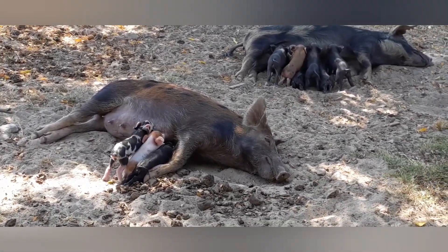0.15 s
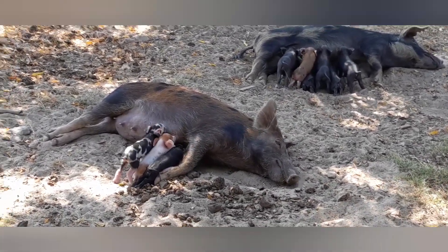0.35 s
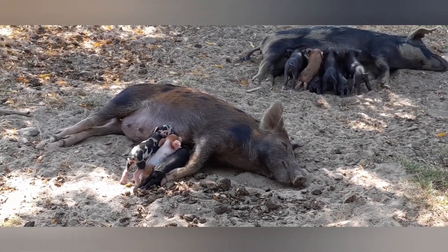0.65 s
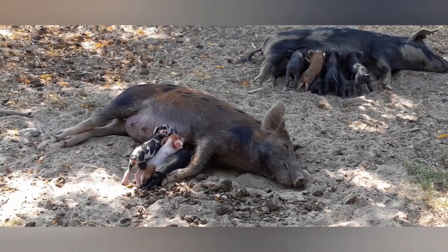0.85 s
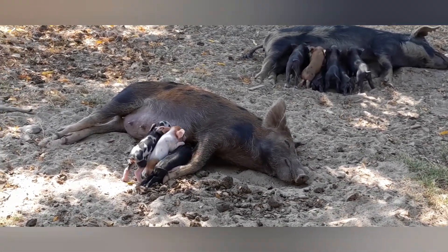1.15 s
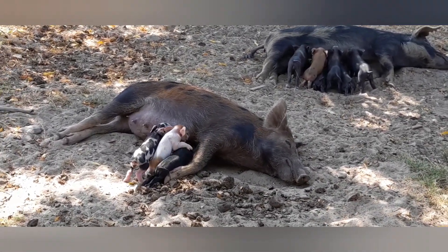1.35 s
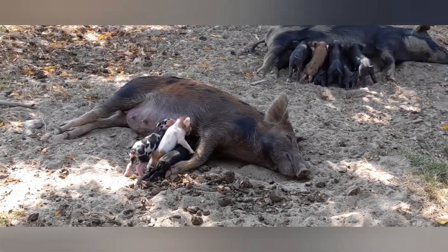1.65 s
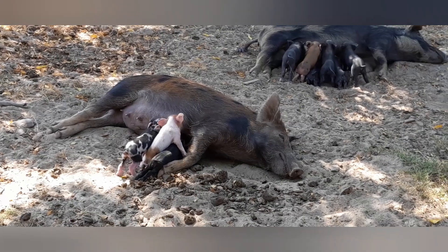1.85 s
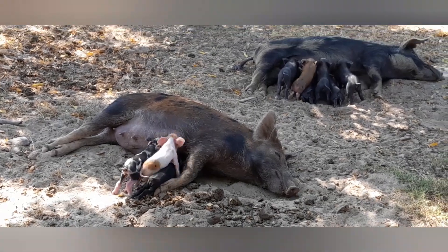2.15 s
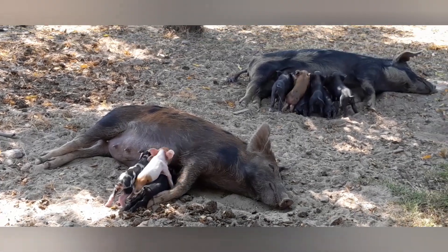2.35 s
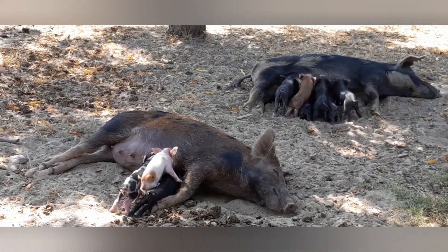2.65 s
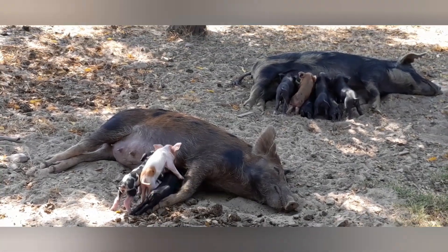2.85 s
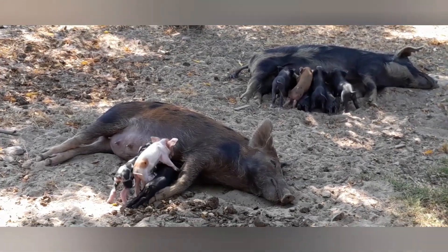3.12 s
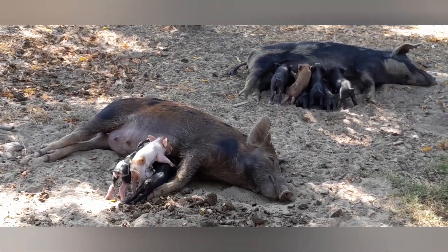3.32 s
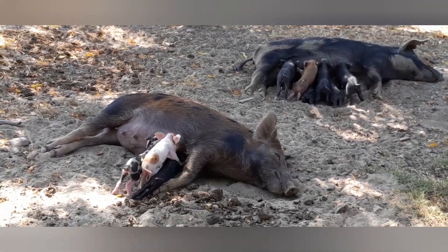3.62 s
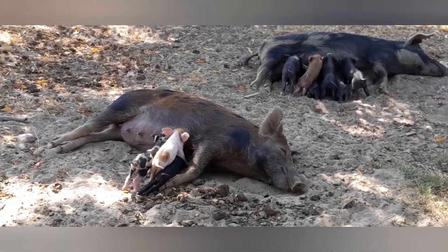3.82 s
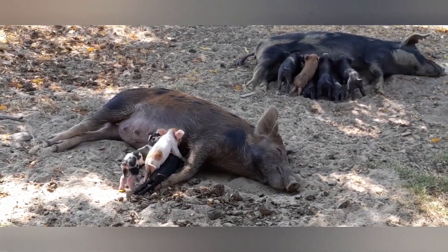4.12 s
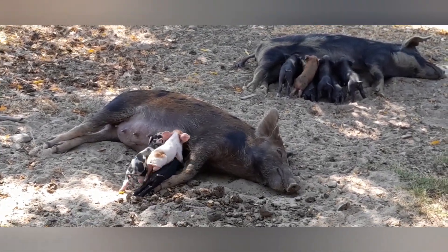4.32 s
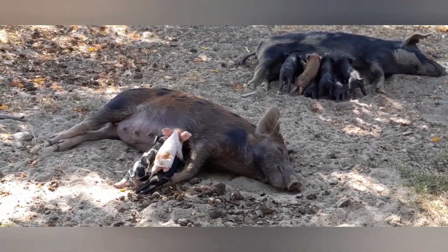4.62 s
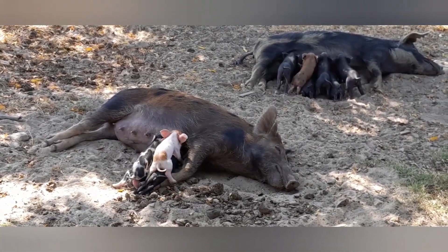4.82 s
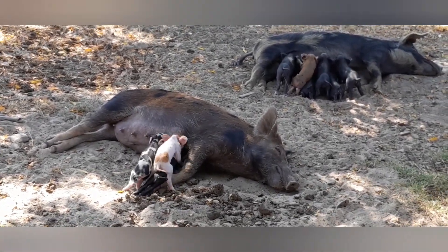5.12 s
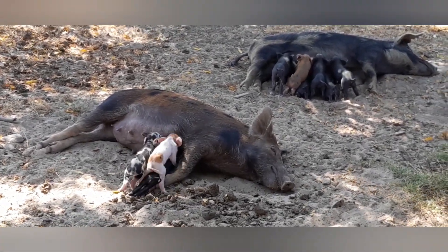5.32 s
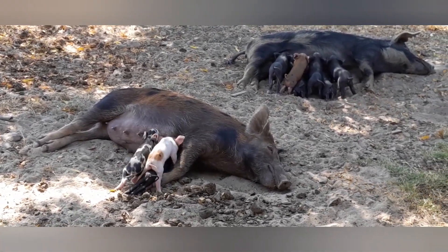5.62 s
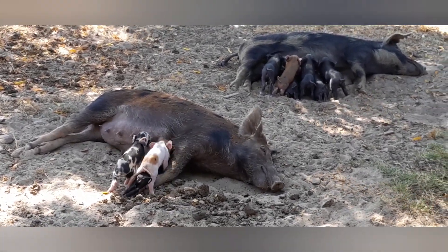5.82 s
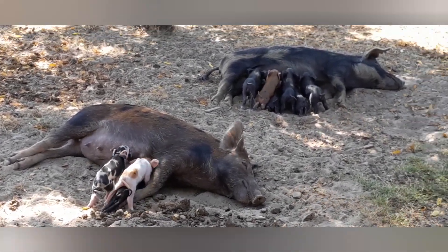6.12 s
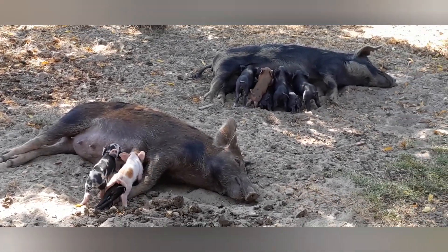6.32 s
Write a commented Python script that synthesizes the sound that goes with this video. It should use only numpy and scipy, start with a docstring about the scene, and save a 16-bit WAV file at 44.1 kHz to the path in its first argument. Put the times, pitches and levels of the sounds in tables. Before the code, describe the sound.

In an open, shaded yard, low wind rumble buffets the microphone from the start, heaviest to the left, fading by about 1.8 seconds. A steady soft hiss and high, pulsing insect buzz and lisping chirps, around two swells a second, continue throughout. A sow close by grunts quietly at 0.2 seconds, then more fully near 0.7, 1.25, 1.8, 2.4, 2.9, 3.5 and 4.1, weakly at 4.9, then at 5.3 and 5.8. Each is a deep, rattling throat pulse train, mostly a tenth of a second, with longer ones at 1.8, 2.9, 4.1 and 5.8. Soft fluttering snorts come around 0.6, 1.1, 1.7, 2.4, 5.0, 5.5 and, strongest, 6.1. Tiny muffled piglet grunts appear near 0.4, 2.9, 3.9 and 5.25. Very faint far whistles rise near 0.3, 2.0, 3.9 and 5.6. Faint gusts return around 4.5 and 5.0, with a stronger rumble at 6.1.

```python
"""Wind rumbles and insects buzz, then a sow starts to grunt in a steady rhythm while her piglets suckle.
Each grunt is a short train of slow throat pulses ringing in chest, nose, throat and snout.
Softer snorts flap in between, and the piglets add brief breathy grunts made of ringing noise.
The insects are swelling coloured noise, the thin far whistles are wavering tones,
and the gusts are low noise that swells and fades. A steady hiss fills the grove."""
import sys
import numpy as np
from scipy import signal
from scipy.fft import rfft, irfft, next_fast_len
from scipy.io import wavfile
from scipy.ndimage import uniform_filter1d

SR = 44100
rng = np.random.default_rng(int(sys.argv[2]) if len(sys.argv) > 2 else 0)


def master(y):
    """Save y as 16-bit WAV."""
    cut = np.clip(np.atleast_2d(y).T, -1, 1)
    pcm = np.round(cut * 32767)  # scale
    wavfile.write(sys.argv[1], SR, pcm.astype(np.int16))


N = 284886
TIME = np.arange(N) / SR

# The sow's grunts. Each row: start in seconds, length in seconds, opening pulse rate in Hz,
# settled pulse rate in Hz, age at the hardest push in seconds,
# then the relative strengths of chest, throat and rasp in dB.
GRUNT_ROWS = [(0.177, 0.096, 84.04, 53.2, 0.057, -41.5, -50.5, -59.5),
              (0.732, 0.108, 80.94, 47.44, 0.053, -37, -42.5, -40.5),
              (1.25, 0.12, 66.73, 60.8, .06, -37, -45, -45.5),
              (1.781, 0.25, 80.12, 52.17, 0.11, -36, -42.5, -45),
              (2.397, 0.11, 74.4, 45.97, 0.037, -36.5, -43, -45),
              (2.924, 0.2, 69.8, 53.39, 0.06, -35, -42, -42),
              (3.531, 0.12, 68.5, 53.73, 0.044, -34.5, -43, -43.5),
              (4.095, 0.295, 66.02, 51.63, 0.029, -37.5, -42.5, -45),
              (4.856, 0.074, 88, 46.21, 0.021, -47, -49.5, -63.5),
              (5.293, 0.115, 97.86, 54.44, 0.014, -40.5, -44.5, -49),
              (5.82, 0.32, 80.44, 50.28, 0.14, -38, -43, -45)]
SLOWING_S = 0.035  # the pulses slow from the opening rate to the settled one
FADE_S, FADE_SLOWING = 0.015, 0.15  # the last pulses drag: over this time, by this share of the rate


def throat_pulses(jitter_s):
    """Times and periods of the throat pulses: quick as a grunt starts, then settling to a slow rattle."""
    times, periods = [], []
    for start, length, opening_hz, settled_hz, *_ in GRUNT_ROWS:
        age = np.arange(0, length, 1 / SR)
        rate = settled_hz + (opening_hz - settled_hz) * np.exp(-(age / SLOWING_S) ** 2)
        rate = rate * (1 - FADE_SLOWING * np.exp((age - length) / FADE_S))
        cycles = np.cumsum(rate) / SR
        # one pulse each time the count of cycles reaches a whole number
        closing = np.searchsorted(cycles, np.arange(cycles[-1]))
        times.extend(start + age[closing])
        periods.extend(1 / rate[closing])
    jitter = jitter_s * rng.standard_normal(len(times))
    return np.array(times) + jitter, np.array(periods)


PUSH_S = 0.011  # half length of the hardest push


def current_grunt():
    """At every moment: age of the grunt under way, its length, its push (0-1) and its three strengths."""
    rows = np.array(GRUNT_ROWS)
    # each row takes over 0.05 s before its grunt starts
    row_now = np.maximum(np.searchsorted(rows[:, 0] - 0.05, TIME) - 1, 0)
    start, length, _, _, push_s, *levels_db = rows[row_now].T
    age = TIME - start
    push = np.exp(-((age - push_s) / PUSH_S) ** 2)
    return age, length, push, levels_db


def settling(age, after_s, over_s):
    """0 in the harsh start of each grunt, rising to 1 as the folds find a steady swing."""
    return 0.5 + 0.5 * np.tanh((age - after_s) / over_s)


def effort(age, length, soft_db, attack_s, hold_s, sag_db_per_s, release_share, release_db):
    """Gain through a grunt: it starts soft, swells, sags as the push weakens, and dies over its last part."""
    attack = soft_db * np.exp(-np.maximum(age, 0) / attack_s)
    sag = sag_db_per_s * np.maximum(age - hold_s, 0)
    release = release_db * np.maximum(1 + (age / length - 1) / release_share, 0)
    return from_db(-attack - sag - release)


# Resonances of the sow's chest, nose and throat.
# Each row: frequency in Hz, width of one filter pass in Hz, relative level in dB.
CHEST_MODES = [(64, 23, 3.5), (97.3, 40, 3), (161.7, 73, 1.5)]
NOSE_MODES = [(240.4, 71, -0.5), (296, 74.7, 6), (392, 41, -11.5)]
THROAT_MODES = [(696.3, 153, 4.6), (806.2, 103.6, 6.95)]
# Resonances of the snout as a grunt bursts out, and once it has settled; same columns.
SNOUT_EARLY_MODES = [(1118, 184, -13), (1356, 138, -6), (1523, 120, 1.5), (1769, 144, -5.5),
                     (2153, 160, -3), (2630, 570, -20), (5060, 620, -18.5), (8850, 2400, -34)]
SNOUT_LATE_MODES = [(1030, 300, -14), (1450, 260, -6.5), (1624, 43, -1), (1730, 130, 1.5), (2187, 43, 0),
                    (2460, 950, -16)]
PUSH_RASP_DB, PUSH_THROAT_DB = 7, 2  # what the hardest push adds


def grunts():
    """The folds part with a small flick and shut with a snap; both ring in the airway, with a puff of air."""
    times, periods = throat_pulses(jitter_s=0.0004)
    age, length, push, (chest_db, throat_db, rasp_db) = current_grunt()
    settled = settling(age, after_s=0.097, over_s=0.0063)

    # the rasp rises fastest, the chest fills last
    chest = from_db(chest_db) * effort(
        age, length, soft_db=7.5, attack_s=0.049, hold_s=0.14,
        sag_db_per_s=47, release_share=0.21, release_db=5.5)
    throat = from_db(throat_db + PUSH_THROAT_DB * push) * effort(
        age, length, soft_db=8, attack_s=0.024, hold_s=0.096,
        sag_db_per_s=33.5, release_share=0.27, release_db=14)
    rasp = from_db(rasp_db + PUSH_RASP_DB * push) * effort(
        age, length, soft_db=3.5, attack_s=0.014, hold_s=0.05,
        sag_db_per_s=34.5, release_share=0.36, release_db=11)

    def drive(level, shimmer_db):
        """Pulses of slightly uneven size; slower pulses are larger, to keep the power."""
        uneven = from_db(shimmer_db * rng.standard_normal(len(times)))
        sizes = np.interp(times, TIME, level) * np.sqrt(periods * SR) * uneven
        return clicks(times, sizes)

    def snap(pulses, flick):
        """Each closing snap, a smaller flick 2.553 ms before it, and a puff of air."""
        air = (0.72 - 0.3 * settled) * puffs(pulses, decay_s=0.005)
        return pulses + flick * delay(pulses, -0.002553) + air

    chest_pulses = drive(chest * (1 - 0.22 * settled), shimmer_db=0.54)
    low = -from_db(-2.5) * resonate(snap(chest_pulses, flick=0.063), CHEST_MODES)

    # in a settled grunt the chest hums cleanly at twice the pulse rate
    cycles = np.interp(TIME, times, np.arange(len(times)))
    is_pulsing = np.gradient(cycles) * SR > 30
    swinging = uniform_filter1d(1.0 * is_pulsing, size=SR // 50)
    hum = from_db(-1.0) * chest * settled * swinging * np.cos(4 * np.pi * cycles)

    nose_pulses = drive(np.sqrt(chest * throat), shimmer_db=0.5)
    nasal = from_db(-2) * resonate(snap(nose_pulses, flick=0.046), NOSE_MODES)
    mouth_pulses = drive(throat, shimmer_db=1.8)
    mouth = from_db(1.0) * resonate(snap(mouth_pulses, flick=0.2), THROAT_MODES)

    crackle = delay(snap(drive(rasp, shimmer_db=1.5), flick=0.34), 0.001048)
    snout_early = from_db(-5.5) * resonate(crackle * (1 - settled), SNOUT_EARLY_MODES)
    snout_late = from_db(-4.0) * resonate(crackle * settled, SNOUT_LATE_MODES)
    return from_right(low + hum + nasal + mouth + snout_early + snout_late, lag_s=0.00013)


# The sow's snorts. Each row: time of the middle flap in seconds, relative level in dB,
# flaps per second, dB gained from flap to flap.
SNORT_ROWS = [(0.564, -36.5, 32.7, -3), (1.11, -30, 33.2, 0), (1.721, -33.5, 36.3, 4),
              (2.364, -33.5, 34.4, -2.5), (4.979, -34, 42, -2), (5.454, -28.5, 29.7, 4),
              (6.089, -26, 32, -1)]
# Resonances of the airway in a snort. Each row: frequency in Hz, width of one filter pass in Hz,
# relative level in dB.
SNORT_MODES = [(94, 109, 2.5), (311.5, 100, 9.5), (661.6, 113, 7), (1004, 110, -14.5), (1338, 165, -4),
               (1580, 270, -11), (2380, 2200, -23)]


def snorts():
    """Air streams through the snout while soft tissue flaps a few times, swelling and fading."""
    flaps = np.arange(-2, 3)
    pulses = 0
    for s, peak_db, per_s, gained_db in SNORT_ROWS:
        uneven_db = rng.normal(0, 1, len(flaps))
        sizes_db = peak_db + gained_db * flaps - 7.1 * np.abs(flaps) ** 1.35 + uneven_db
        pulses = pulses + clicks(s + flaps / per_s, from_db(sizes_db))
    air = 0.42 * puffs(pulses, decay_s=0.01)
    breath = swells(np.array(SNORT_ROWS)[:, :2], rise_s=0.058, fall_s=0.057)
    stream = from_db(-37.5) * breath * rng.standard_normal(N)
    return from_right(from_db(18) * resonate(pulses + air + stream, SNORT_MODES), lag_s=0.0001)


# Small grunts of the piglets. Each row: time in seconds, half length in seconds,
# mouth resonance in Hz, level in dB.
PIGLET_ROWS = [(0.405, 0.037, 610, -56.5), (2.901, 0.02, 605.6, -58.5), (3.902, 0.0086, 686, -60.5),
               (5.252, 0.017, 600, -57.5)]


def piglets():
    """Brief, muffled grunts against the teats: breath noise ringing in a small mouth."""
    out = 0
    for s, half_s, hz, level_db in PIGLET_ROWS:
        breath = rng.standard_normal(N)
        mouth = rms_one(resonate(breath, [(300, 160, -7), (hz, 170, 0), (1400, 600, -15)]))
        out = out + from_db(level_db) * np.exp(-((TIME - s) / half_s) ** 2) * mouth
    return out


# Gusts on the microphone. Each row: time in seconds, relative rumble level in dB.
GUST_ROWS = [(0.045, -44), (0.25, -46.5), (0.37, -52.5), (0.43, -54), (0.71, -52.5), (0.845, -51),
             (1.0, -64), (1.13, -52.5), (1.27, -52), (1.35, -48.5), (1.43, -52), (1.74, -57.5), (4.41, -62),
             (4.53, -65), (4.62, -64), (5.02, -58), (6.13, -49)]
# Colour of the gusts. Each row: frequency in Hz, relative level in dB.
RUMBLE_COLOUR = [(20, 3), (35, -20), (55, -4), (75, 2.5), (100, -6.5), (160, -23.5), (400, -42),
                 (3000, -100)]


def wind():
    """Gusts swell and fade, stronger on the left; the eddies are evened so each gust has its own strength."""
    # part of the rumble is shared by both sides, part is separate
    eddies = noise(RUMBLE_COLOUR, channels=1) + 1.13 * noise(RUMBLE_COLOUR)
    power = uniform_filter1d(np.mean(eddies ** 2, axis=0), size=SR // 25)
    eddies = eddies / np.sqrt(power)
    gusts = swells(GUST_ROWS, rise_s=0.061, fall_s=0.037)
    return from_db(8.5) * gusts * eddies * from_db([[3.4], [-3.4]])


# Beat of each insect chorus, as one row: first swell in seconds, period in seconds,
# seconds added to the period each beat.
BUZZ_PACE = (0.09, .478, 0.0077)
LISP_PACE = (0.27, .426, -0.0023)
# Loudness of each chorus over time. Each row: time in seconds, relative level in dB.
BUZZ_LOUDNESS = [(0.1, -51.5), (1.07, -58), (2.06, -53), (3.6, -50.5), (4.13, -52), (5.2, -56.5),
                 (5.77, -53.5), (6.33, -60)]
LISP_LOUDNESS = [(0.28, -57.5), (0.7, -59.5), (2.0, -55.5), (2.8, -63), (3.2, -64.5), (4.0, -60),
                 (5.65, -60.5), (6.04, -53.5), (6.44, -62)]
# Colour of each chorus. Each row: frequency in Hz, relative level in dB per Hz.
BUZZ_COLOUR = [(3000, -26.5), (5000, -20), (6200, -15.5), (6700, -5.5), (7300, -3.5), (7900, -5.5),
               (8600, -36), (10000, -27.5)]
LISP_COLOUR = [(2000, -14.5), (3300, 5.5), (5000, 0), (6000, 2), (7000, 13), (8000, 7.5), (9500, -9.5),
               (11000, -0.5), (12500, 3), (14000, -2), (16000, -6)]


def insects():
    """Two noisy choruses swell at their own pace, with a fine flutter; a lower chirp joins each lisp."""
    buzzes = beats(BUZZ_PACE, BUZZ_LOUDNESS)
    lisps = beats(LISP_PACE, LISP_LOUDNESS)
    buzz_gain = swells(buzzes, rise_s=0.066, fall_s=0.14) * from_db(0.77 * drift(120))
    buzz = from_db(-1) * buzz_gain * noise(BUZZ_COLOUR)
    lisp_gain = swells(lisps, rise_s=0.13, fall_s=0.097) * from_db(2.1 * drift(170))
    lisp = from_db(1) * lisp_gain * noise(LISP_COLOUR)
    chirp_noise = resonate(rng.standard_normal(N), [(4430, 710, 0)])
    chirp = from_db(-7.5) * swells(lisps, rise_s=0.027, fall_s=0.087) * chirp_noise
    return buzz + lisp + chirp


def beats(beat, loudness):
    """Rows of time and level for a chorus whose beat slowly changes pace."""
    first_s, period_s, added_s = beat
    k = np.arange(16)
    times = first_s + period_s * k + added_s * k * (k - 1) / 2
    return np.column_stack([times, np.interp(times, *np.transpose(loudness))])


# Thin far whistles, before they waver. Each row: start in seconds, end in seconds,
# start pitch in Hz, end pitch in Hz, level in dB.
WHISTLE_ROWS = [(0.26, 0.578, 935, 973, -70.5), (1.985, 2.325, 884, 946, -70.5),
                (3.88, 4.111, 900, 957, -77.5), (5.574, 5.88, 918.5, 965, -71.5)]


def whistles():
    """Faint tones that rise and level off, wavering in pitch and strength."""
    out = 0
    waver = 1 + 0.016 * drift(110)
    for start, end, start_hz, end_hz, level_db in WHISTLE_ROWS:
        along = np.clip((TIME - start) / (end - start), 0, 1)
        hz = (start_hz + (end_hz - start_hz) * np.sin(np.pi / 2 * along)) * waver
        swell = np.sqrt(np.abs(np.sin(np.pi * along)))
        out = out + from_db(level_db) * swell * np.sin(2 * np.pi * np.cumsum(hz) / SR)
    return out * from_db(2.5 * drift(45))


# Colour of the grove's steady hiss. Each row: frequency in Hz, relative level in dB per Hz.
GROVE_COLOUR = [(30, -5), (65, 11.5), (120, -2), (220, -3.5), (310, -7.5), (500, -11), (1000, -14.5),
                (2000, 0), (3000, -6), (4600, -1.5), (6000, -5), (7000, 4), (8800, -14), (10000, -18.5),
                (12500, -12.5), (16000, -18)]


def grove():
    """Steady background hiss: coloured noise, unrelated on the two sides."""
    return from_db(-59.0) * noise(GROVE_COLOUR)


def yard(x):
    """Ground and trunks scatter a short tail: noise that starts after 8 ms and drops 60 dB in 0.3 s."""
    t = TIME[:SR // 2]
    tail = rng.standard_normal((2, len(t))) * from_db(-60 * t / 0.3) * (t > 0.008)
    tail = tail / np.linalg.norm(tail, axis=1, keepdims=True)
    return signal.oaconvolve(x, tail, axes=1)[:, :N]


def from_db(db):
    """Decibels to gain."""
    return 10 ** (np.asarray(db) / 20)


def rms_one(x):
    """Scale to an rms of 1."""
    return x / np.sqrt(np.mean(x ** 2) + 1e-20)


def noise(spectrum, channels=2):
    """Unrelated noise in each channel with the given colour; rms 1."""
    return rms_one(colour(rng.standard_normal((channels, N)), spectrum))


def colour(x, spectrum):
    """Filter by a table of frequency in Hz and level in dB, joined along a logarithmic frequency scale."""
    hz, level_db = np.transpose(spectrum)
    size = next_fast_len(N + SR // 10)
    bin_hz = np.arange(size // 2 + 1) * SR / size
    gain = from_db(np.interp(np.log(bin_hz + 1), np.log(hz), level_db))
    return irfft(rfft(x, size) * gain, size)[..., :N]


def drift(rate):
    """Random values with a spread of 1, this many per second, joined by straight lines."""
    knots = rng.standard_normal(4096)
    return np.interp(TIME * rate, np.arange(len(knots)), knots)


def swells(rows, rise_s, fall_s):
    """Gain of a row of bell-shaped swells that add in power."""
    power = 0
    for s, peak_db in rows:
        width_s = np.where(TIME < s, rise_s, fall_s)
        bell = 1 / (1 + ((TIME - s) / width_s) ** 2) ** 2
        power = power + (from_db(peak_db) * bell) ** 2
    return np.sqrt(power)


def resonate(x, modes):
    """Parallel resonances, each applied twice for dark valleys; the energy of a click is kept."""
    click = signal.unit_impulse(SR // 10)
    response = 0
    for k, (hz, width_hz, level_db) in enumerate(modes):
        r = np.exp(-np.pi * width_hz / SR)
        b = (1 - r * r) / 2 * np.array([1, 0, -1])
        a = [1, -2 * r * np.cos(2 * np.pi * hz / SR), r * r]
        ringing = signal.lfilter(b, a, signal.lfilter(b, a, click))
        response = response + (-1) ** k * from_db(level_db) * ringing  # neighbours have opposite signs
    return signal.oaconvolve(x, response / np.linalg.norm(response))[:N]


def delay(x, s):
    """The same sound s seconds later."""
    return np.interp(TIME - s, TIME, x)


def clicks(times, sizes):
    """Single-sample pulses."""
    places = np.clip(np.round(times * SR).astype(int), 0, N - 1)
    return np.bincount(places, sizes, N)


def puffs(pulses, decay_s):
    """Each pulse lets out a dying puff of turbulence with the same energy."""
    r = np.exp(-2 / (decay_s * SR))
    power = signal.lfilter([1 - r], [1, -r], pulses ** 2 + 1e-24)
    return np.sqrt(power) * rng.standard_normal(N)


def from_right(x, lag_s):
    """A source on the right reaches the left port later."""
    return np.array([delay(x, lag_s), x])


def scene():
    """The sow and her litter close by, the grove around them."""
    pigs = grunts() + snorts() + piglets()
    scattered = from_db(-16.5) * yard(pigs)
    return pigs + scattered + wind() + insects() + whistles() + grove()


# The two microphone ports are coloured differently.
# Each row: frequency in Hz, left minus right in dB.
PORT_BALANCE = [(60, 2.5), (150, 0.5), (380, 2), (700, 6.5), (1000, 4.5), (1450, 2), (1800, 2), (2300, 0.5),
                (4600, 8), (6400, 10), (7500, -1), (9000, -7), (12500, -2)]
CUTOFF_HZ = 15750


def record(dry):
    """Each port adds its colour and loses the deepest bass; the top is cut."""
    ports = []
    for x, side in zip(dry, (1, -1)):
        # half the difference goes to each port
        tint = [(hz, side * balance_db / 2) for hz, balance_db in PORT_BALANCE]
        ports.append(colour(x, tint))
    bass_cut = signal.butter(2, 38, "high", fs=SR, output="sos")
    top_cut = signal.ellip(12, 0.1, 80, CUTOFF_HZ, fs=SR, output="sos")
    thinned = signal.sosfilt(bass_cut, ports)
    return signal.sosfilt(top_cut, thinned)


dry = scene()
out = record(dry)
master(out)
```